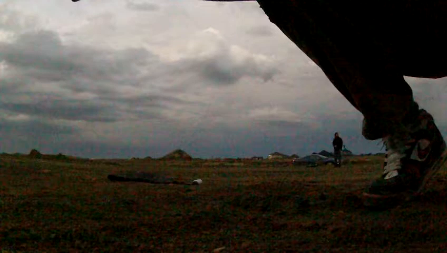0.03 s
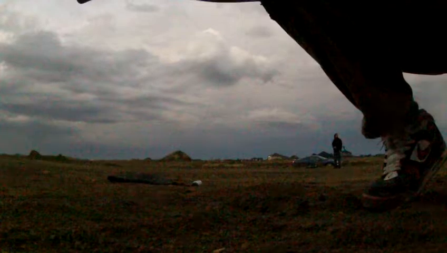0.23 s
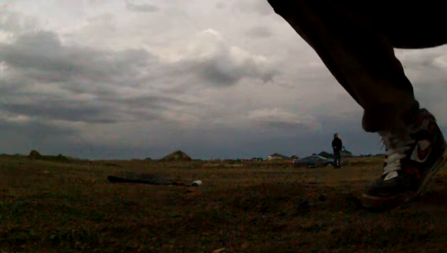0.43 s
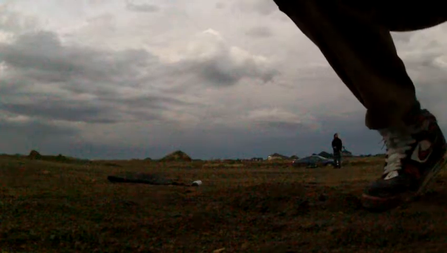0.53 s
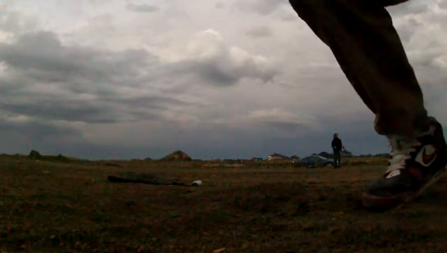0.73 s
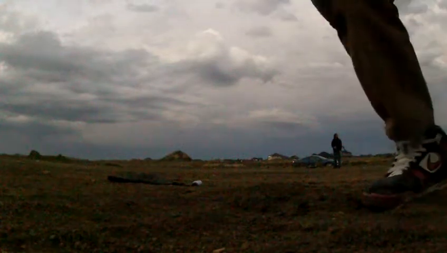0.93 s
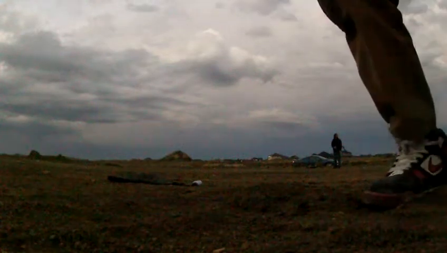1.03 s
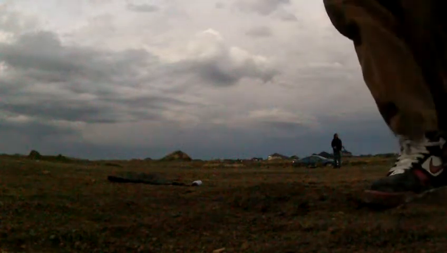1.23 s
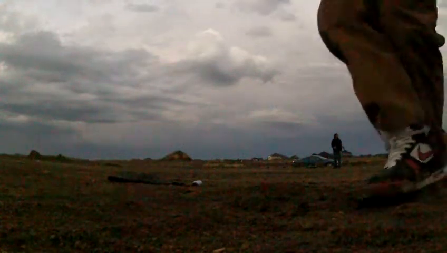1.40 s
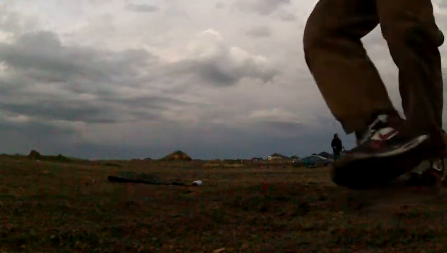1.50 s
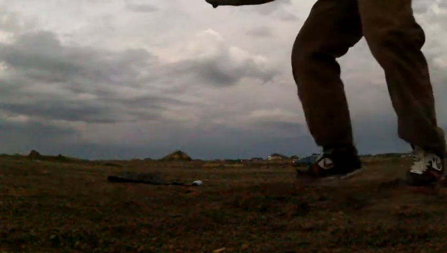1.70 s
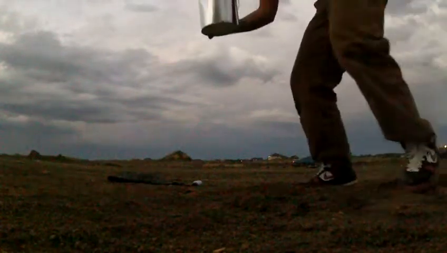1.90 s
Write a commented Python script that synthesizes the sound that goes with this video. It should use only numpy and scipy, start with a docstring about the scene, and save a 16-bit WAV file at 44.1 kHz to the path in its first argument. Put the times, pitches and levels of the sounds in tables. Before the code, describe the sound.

A small plastic camera knocks loudly and squeaks as it is let go, then faint wind.

```python
"""A small camera's plastic case, heard at its own microphone, is jolted as a hand lets go: it slips and
knocks four times and once faintly, squeaks, scrapes and rocks to rest. It lies in the grass of a field,
in low wind, with a faint tone far off and shoes scuffing the turf.
The recorder holds coarse samples, which mirrors every sound into a gritty treble."""
import sys
import numpy as np
from scipy import signal
from scipy.fft import rfft, irfft
from scipy.io import wavfile
from scipy.ndimage import uniform_filter1d

SR = 44100
rng = np.random.default_rng(int(sys.argv[2]) if len(sys.argv) > 2 else 0)


def transcribe(signal):
    """Save signal, clipped to [-1, 1], as a 16-bit WAV file at the path in sys.argv[1]."""
    frames = np.atleast_2d(signal).T
    limited = np.clip(frames, -1, 1)
    pcm = np.round(limited * 32767).astype(np.int16)
    wavfile.write(sys.argv[1], SR, pcm)


N = 85995

# slips of the case, right at the microphone (time [s], knock [dB], low push [dB], push length [s])
CASE_SLIPS = [(.1262, -14.5, -31, 0.0042), (0.1361, -7, -17, 0.0092), (.1505, -7, -18.5, 0.0074),
              (0.167, -7.5, -14.5, 0.0076), (0.1787, -27.5, -32, 0.0099)]
# modes of the plastic case (frequency [Hz], level [dB], t60 [s])
CASE_MODES = [(480, -20, 0.022), (980, -0.5, .018), (940, -33.5, 0.28), (1180, -13, 0.014),
              (1552, -8.5, 0.018), (1860, -16.5, 0.007), (2625, -9.5, .02), (3310, -15, .010)]
# skin dragging on the plastic (time [s], length [s], pitch [Hz], level [dB])
SKIN_SQUEAKS = [(0.1509, .0033, 3072, -6), (.1670, 0.0046, 2580, -2)]
# hollow rubs as the hand slides off (centre [s], half width [s], pitch [Hz], level [dB])
HAND_RUBS = [(.194, .008, 933.2, -43.5), (.205, .004, 880, -29.5), (.217, 0.0034, 831, -25.5),
             (.227, 0.0075, 763.7, -45.5)]
# hiss of those rubs (frequency [Hz], level [dB])
RUB_SPECTRUM = [(100, -3), (500, -7.5), (850, 0.5), (1300, -5), (1900, 1.5), (2800, -2), (3700, -6)]
# shoes on the turf (time [s], rise [s], decay [s], level [dB])
SHOE_SCUFFS = [(.965, 0.047, 0.036, -64.5), (1.226, 0.00098, 0.0052, -55), (1.236, 0.0041, .006, -56),
               (1.325, 0.016, .15, -71)]
# hiss of the brushed turf (frequency [Hz], level [dB])
TURF_SPECTRUM = [(60, 4), (190, 8), (500, 1), (1100, -11), (1700, 6.5), (2500, 5.5), (3600, -4.5)]
# wind down in the grass (frequency [Hz], level [dB])
WIND_SPECTRUM = [(20, -5), (45, -5), (70, -3), (115, 0.5), (200, -5.5), (350, -10), (600, -16.5),
                 (1000, -18), (2000, -22.5), (3000, -25), (3700, -26.5)]
# treble response of the recorder (frequency [Hz], gain [dB])
RECORDER_RESPONSE = [(100, -1), (3500, 0), (5500, 0.5), (9000, 1), (11000, 2.5), (13500, 3), (15000, 1.5),
                     (15600, -6), (17000, -13)]

INPUT_EDGE_HZ, CRACK_EDGE_HZ = 3800, 4300


def amp(db):
    """Decibels to gain."""
    return 10 ** (np.asarray(db) / 20)


def unit(x):
    """Scales to rms 1."""
    return x / np.sqrt(np.mean(x ** 2) + 1e-20)


def coloured(x, spectrum):
    """Filters by a spectrum in dB, read on a log-frequency axis."""
    hz, db = np.transpose(spectrum)
    bins_hz = np.fft.rfftfreq(N, 1 / SR)
    gain = amp(np.interp(np.log(bins_hz + 1), np.log(hz + 1), db))
    return irfft(rfft(x) * gain, N)


def lowpass(x, hz):
    """Steep low-pass."""
    return signal.oaconvolve(x, signal.firwin(301, hz, window=("kaiser", 7), fs=SR), "same")


def wander(hz):
    """Smooth random drift up to the given rate, at rms 1."""
    return unit(irfft(rfft(rng.standard_normal(N)) * (np.fft.rfftfreq(N, 1 / SR) < hz), N))


def since(start):
    """Seconds since start, zero before it."""
    return np.maximum(np.arange(N) / SR - start, 0)


def slips():
    """Right at the microphone, each slip rings the case, cracks and gives a low shove."""
    out = np.zeros(N)
    for start, db, push_db, length in CASE_SLIPS:
        t = since(start)
        ring = sum(amp(level - 60 * t / t60) * np.cos(2 * np.pi * hz * t) for hz, level, t60 in CASE_MODES)
        knock = (t > 0) * ring + amp(-9.5) * crack(start, decay_s=.0025)
        out += amp(db) * knock + amp(push_db) * push(start, length)
    return lowpass(out, CRACK_EDGE_HZ)


def crack(start, decay_s):
    """A short burst of contact noise on the case."""
    t = since(start)
    return (t > 0) * np.exp(-t / decay_s) * unit(lowpass(rng.standard_normal(N), CRACK_EDGE_HZ))


def push(start, length_s):
    """One heavily damped low swing of the microphone."""
    turns = since(start) / length_s
    return -2 * np.sin(2 * np.pi * turns) * np.exp(-2.6 * turns)


def squeaks(roughness=.078, ring_db=-15, ring_s=.003):
    """Close up, skin chatters on the plastic at an unsteady pitch and leaves a short ring."""
    out = np.zeros(N)
    for start, length, hz, db in SKIN_SQUEAKS:
        t = since(start)
        progress = np.minimum(t / length, 1)
        ring = amp(ring_db) * progress * np.exp(-since(start + length) / ring_s)
        level = np.sin(np.pi * progress) + ring
        pitch = (t > 0) * hz * (1 + roughness * wander(hz=1500))
        out += amp(db) * level * np.sin(2 * np.pi * np.cumsum(pitch) / SR)
    return out


def scrapes(roughness=.07, hiss_db=-13.5):
    """The hand slides off: soft rubs make the case hoot, each lower than the last, with a little hiss."""
    out = np.zeros(N)
    for centre, width, hz, db in HAND_RUBS:
        pitch = hz * (1 + roughness * wander(hz=304))
        hoot = np.sin(2 * np.pi * np.cumsum(pitch) / SR)
        hiss = unit(lowpass(coloured(rng.standard_normal(N), RUB_SPECTRUM), INPUT_EDGE_HZ))
        level = amp(db) * np.exp(-((since(0) - centre) / width) ** 2)
        out += level * (hoot + amp(hiss_db) * hiss)
    return out


def settling(rock_at=.225, rock_hz=33, rock_t60=.415, tick_at=.4136):
    """The camera rocks to rest on the grass and ticks once, nudging the microphone."""
    t = since(rock_at)
    rock = amp(-43 - 60 * t / rock_t60) * np.sin(2 * np.pi * rock_hz * t)
    tick = amp(-40) * crack(tick_at, decay_s=.00064)
    nudge = amp(-41.5) * push(tick_at - .001, length_s=.0034)
    return rock + tick + nudge


def scuffs(grain_db=.5):
    """Soles brush the turf with a faint, grainy hiss."""
    level = np.zeros(N)
    for start, rise, decay, db in SHOE_SCUFFS:
        level += amp(db) * np.minimum(since(start) / rise, 1) * np.exp(-since(start + rise) / decay)
    grains = rng.standard_normal(N) * amp(grain_db * wander(hz=410))
    return level * unit(lowpass(coloured(grains, TURF_SPECTRUM), INPUT_EDGE_HZ))


def far_tone(start=.787, length_s=.22, hz=551, rise_s=.013, fall_s=.045):
    """A faint, nearly pure tone from across the field, its level wavering."""
    t = since(start)
    fade = np.clip(np.minimum(t / rise_s, (length_s - t) / fall_s), 0, 1)
    return amp(-66 + 1.66 * wander(hz=25)) * fade * np.sin(2 * np.pi * hz * t)


def wind(patch_db=1.32, swell_db=.25):
    """Wind over the field: a low rush with drifting patches and a slight swell."""
    _, _, spectra = signal.stft(rng.standard_normal(N), SR, nperseg=1024, noverlap=768)
    patches = uniform_filter1d(rng.standard_normal(spectra.shape), size=10, axis=0)  # across frequency
    patches = unit(uniform_filter1d(patches, size=12, axis=1))  # across time
    rush = signal.istft(spectra * amp(patch_db * patches), nperseg=1024, noverlap=768)[1][:N]
    level = amp(-61 - swell_db * wander(hz=5))
    return level * unit(lowpass(coloured(rush, WIND_SPECTRUM), INPUT_EDGE_HZ))


def scene():
    """One microphone in the grass: close handling noise over the quiet field."""
    return (slips() + squeaks() + scrapes() + settling() + scuffs() + far_tone() + wind())[None]


def record(dry):
    """The recorder starts late, overloads, holds each coarse sample as a step and limits the band."""
    start_s, ceiling, hold_hz, oversample = .12, .7, 8000, 4
    t = since(0)
    clipped = np.clip(dry[0] * (t > start_s), -ceiling, ceiling)
    fine_t = np.arange(oversample * N) / (oversample * SR)
    held_t = np.floor(fine_t * hold_hz) / hold_hz
    steps = np.interp(held_t, t, clipped).reshape(N, oversample).mean(1)
    return lowpass(coloured(steps, RECORDER_RESPONSE), hz=16700)[None]


dry = scene()
out = record(dry)
transcribe(out)
```